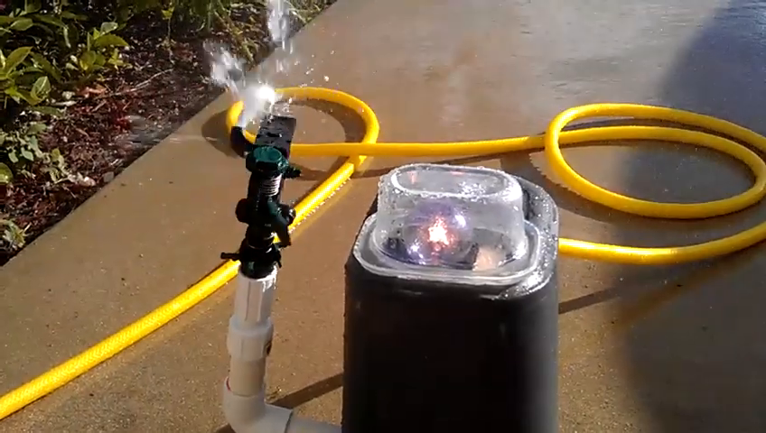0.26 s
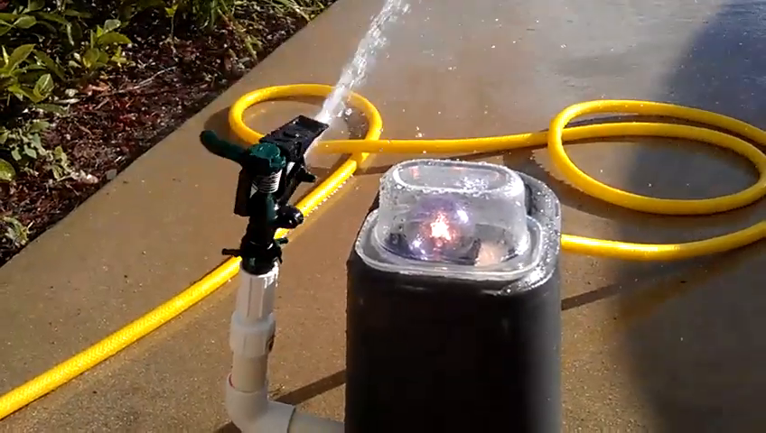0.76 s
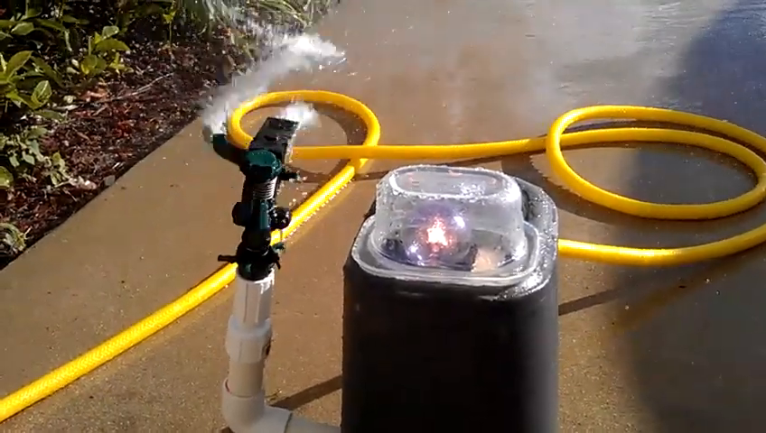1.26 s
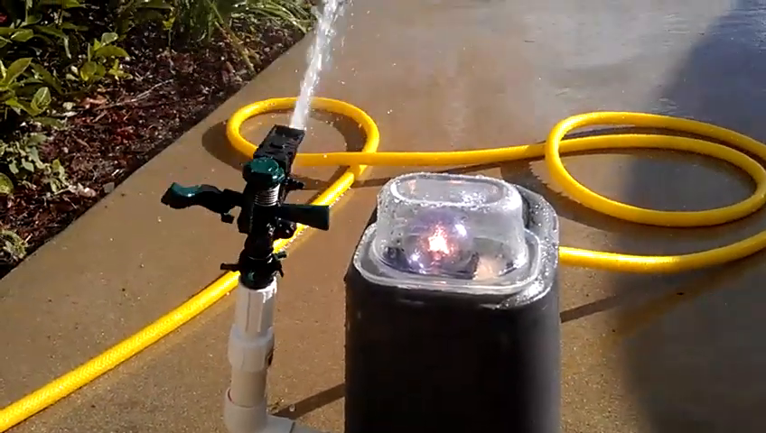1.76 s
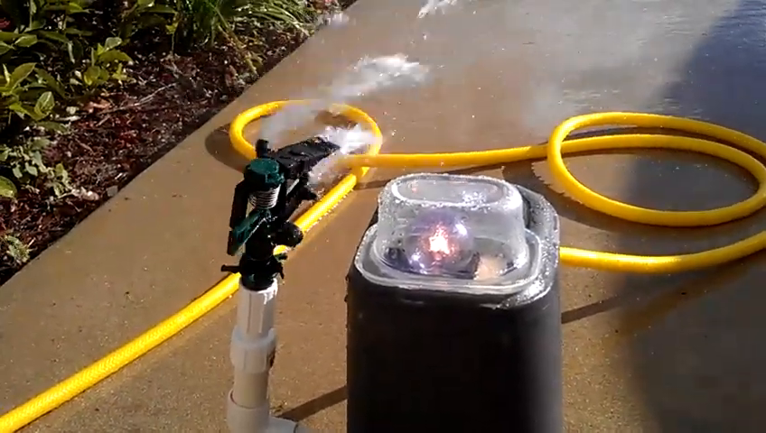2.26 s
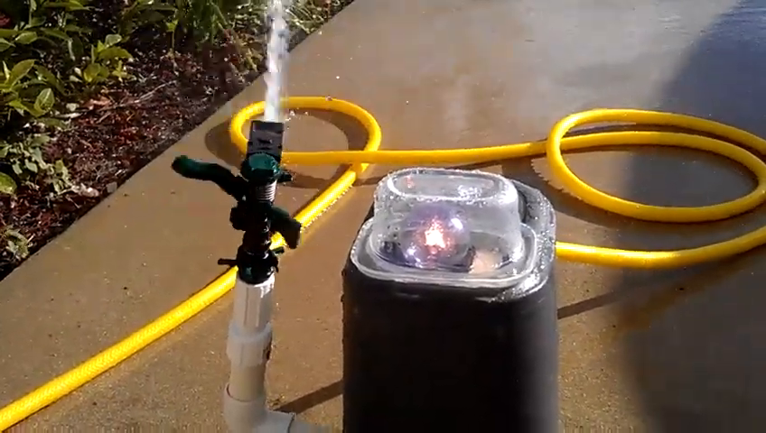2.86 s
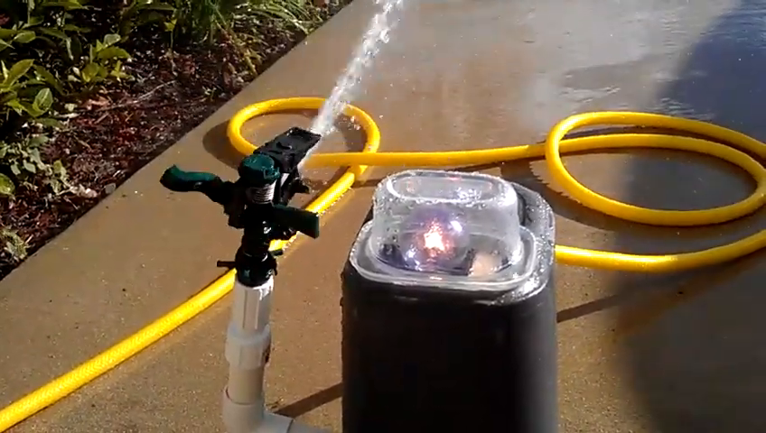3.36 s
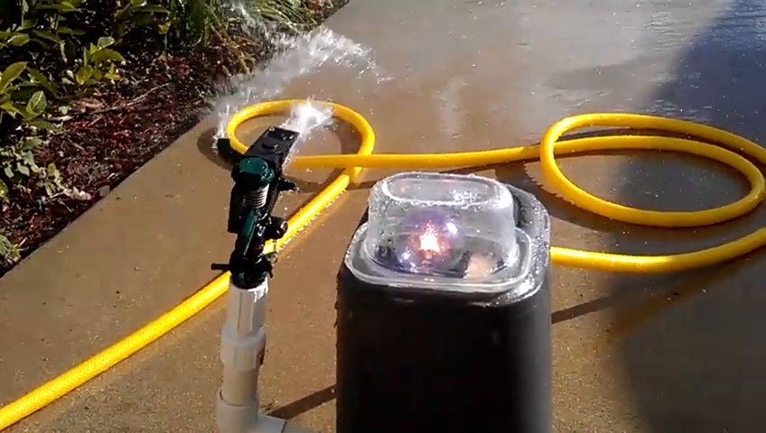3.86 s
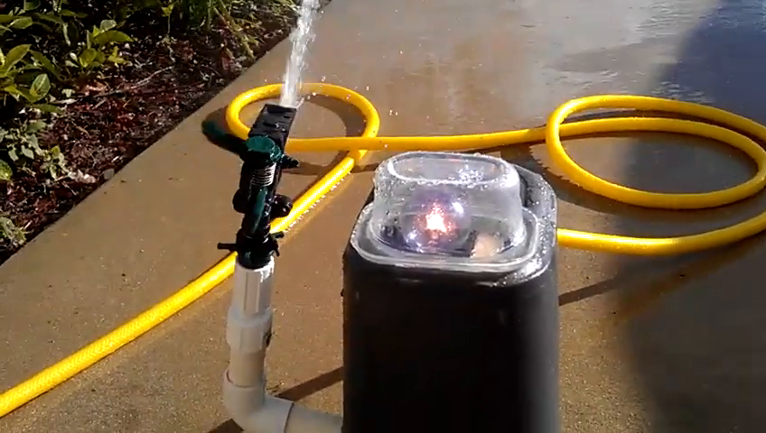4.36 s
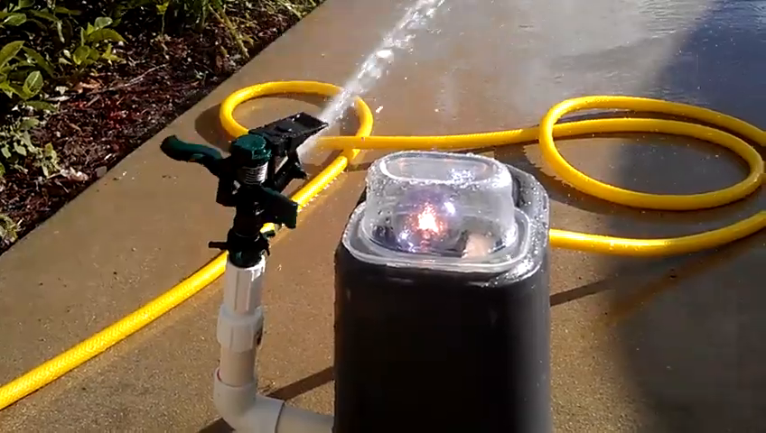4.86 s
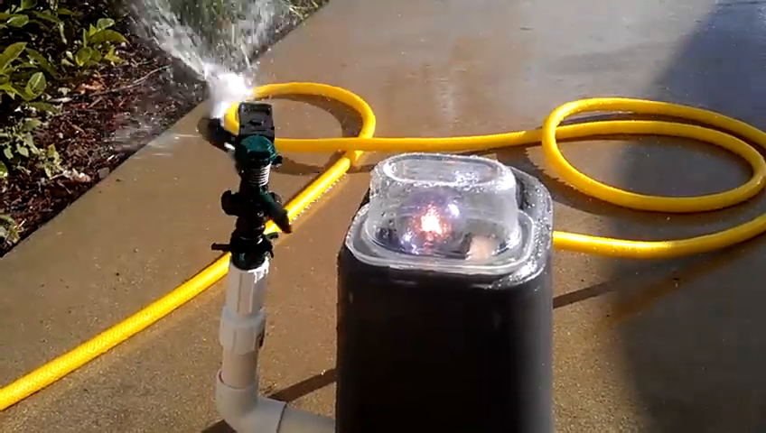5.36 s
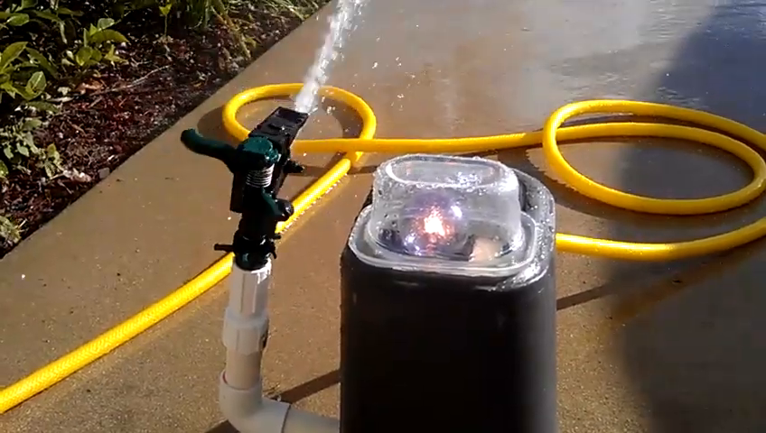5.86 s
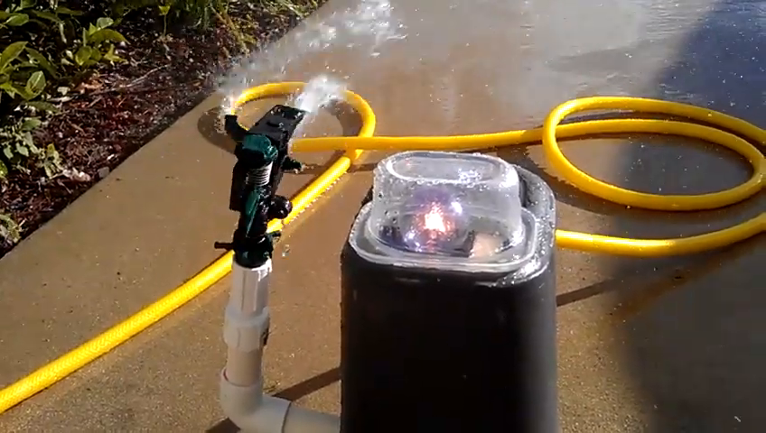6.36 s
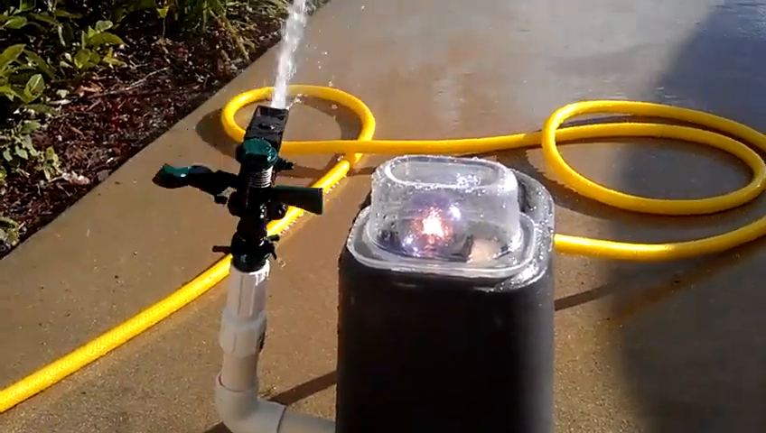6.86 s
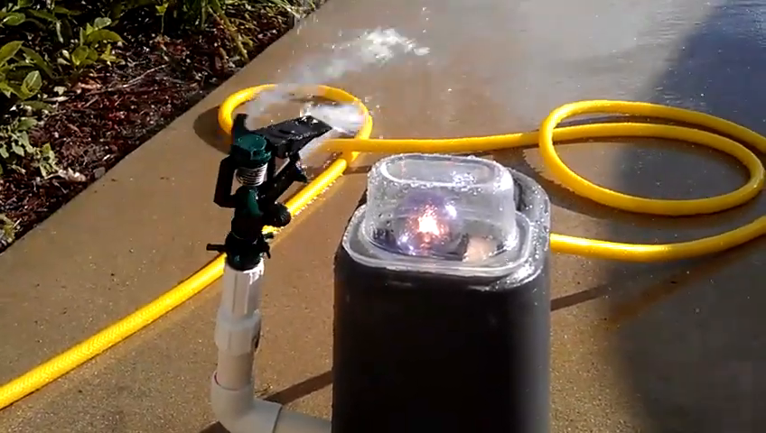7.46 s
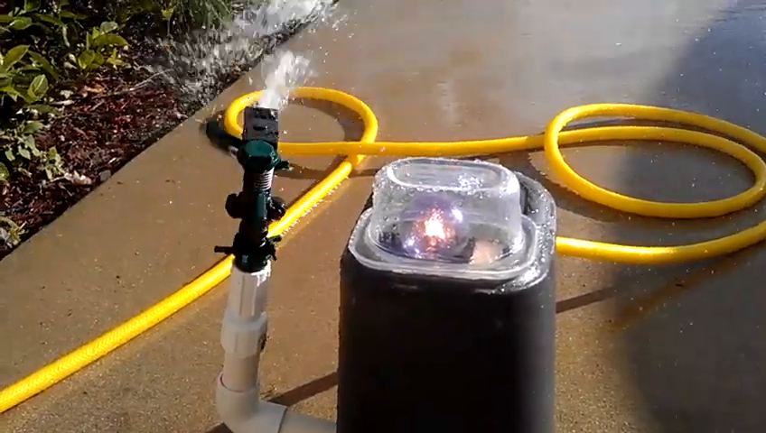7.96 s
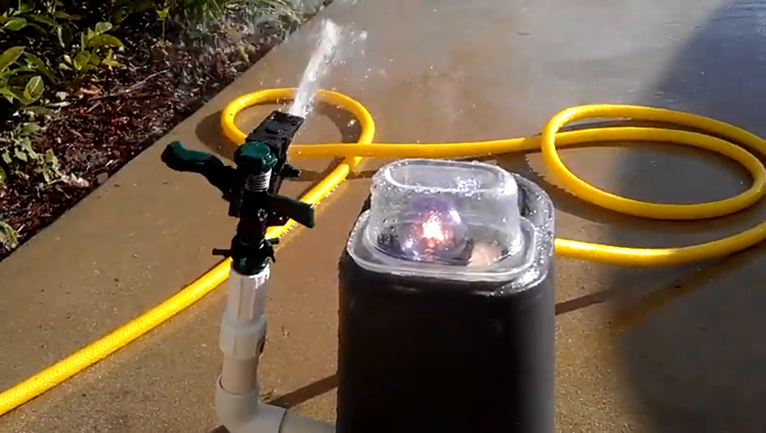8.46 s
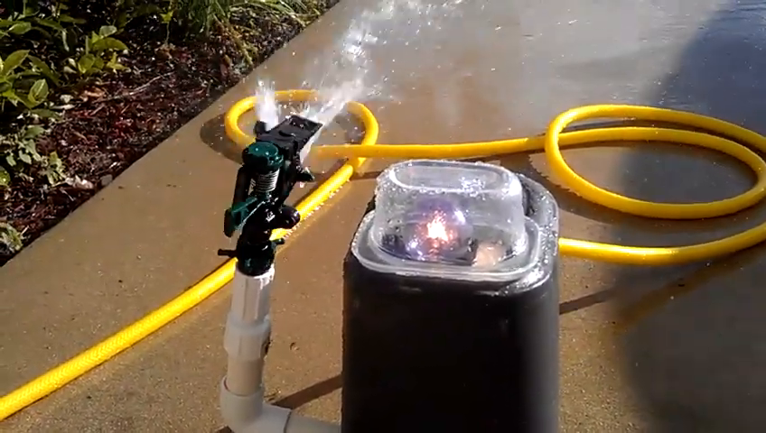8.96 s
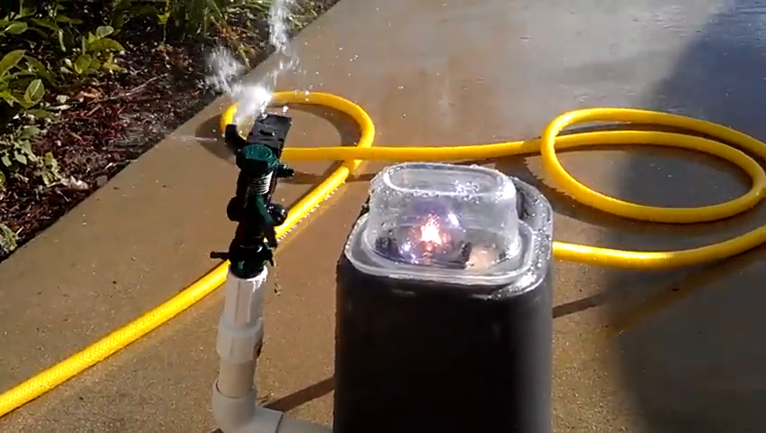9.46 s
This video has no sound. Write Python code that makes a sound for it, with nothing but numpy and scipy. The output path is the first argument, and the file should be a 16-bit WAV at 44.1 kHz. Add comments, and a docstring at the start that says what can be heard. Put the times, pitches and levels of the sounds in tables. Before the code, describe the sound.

Very close stereo pickup of an impact sprinkler beside a concrete path. The arm slaps the jet evenly, about nine crisp splashy knocks a second for nearly a second; a harder slap trips the reverse and it chatters back three times as fast for under half a second. The cycle repeats throughout. Bright water hiss, patter, tiny drop plinks and soft wind thumps fill in; loud peaks distort slightly.

```python
"""An impact sprinkler sweeps to and fro beside a concrete path: going out, its arm slaps the jet about nine
times a second; coming back it chatters about three times as fast. Strokes gate hissing noise into splashes
and strike decaying modes of head and riser pipe. The jet hisses and spray patters as shaped noise, the riser
hums as a sine, and drops plink as damped sines. A breeze buffets the two microphone ports, and loud peaks
overload them."""
import sys
import numpy as np
from scipy import signal
from scipy.fft import rfft, irfft
from scipy.io import wavfile
from scipy.ndimage import uniform_filter1d

SR = 44100
rng = np.random.default_rng(int(sys.argv[2]) if len(sys.argv) > 2 else 0)


def store_pcm(level_fs):
    """Save levels as 16-bit WAV."""
    pcm = np.round(np.clip(level_fs, -1, 1) * 32767).astype(np.int16)
    wavfile.write(sys.argv[1], SR, np.atleast_2d(pcm).T)


N = 428211
TIME = np.arange(N) / SR  # s
FREQ = np.arange(N // 2 + 1) * SR / N  # Hz
SHORT_TIME = TIME[:SR // 4]  # s, for envelopes and rings


def undb(db):
    """Logarithmic level: decibels become an amplitude gain."""
    return 10 ** (np.asarray(db) / 20)


def delay(x, seconds):
    """Propagation delay: the same sound a little later."""
    return np.interp(TIME - seconds, TIME, x, left=0)


def add(track, start, sound):
    """Linear superposition: a short sound is mixed into a track at a time in seconds."""
    i = max(int(start * SR), 0)
    track[..., i:i + sound.shape[-1]] += sound[..., :max(N - i, 0)]


def walk(rate):
    """Random modulation: smooth chance with a spread near 1, taking a new value rate times a second."""
    steps = rng.standard_normal(N // 8)
    return 1.33 * np.interp(TIME * rate, np.arange(len(steps)), steps)


def noise(spectrum, shared, grain_db=0):
    """Partial coherence: shaped noise of rms 1 at two ports, a share of its power common to both."""
    hz, db = np.transpose(spectrum)
    # uneven droplet sizes make the noise grainy
    drops = rng.standard_normal((3, N)) * undb(grain_db * walk(2500))
    share = np.clip(shared, 0, 1)
    pair = np.sqrt(share) * drops[0] + np.sqrt(1 - share) * drops[1:]
    shape = undb(np.interp(np.log(FREQ + 1), np.log(hz), db))
    x = irfft(rfft(pair) * shape, N)
    return x / x.std()


def burst(rise, hold, fall):
    """Exponential decay: a level opens in rise s, stays until hold s and dies with time constant fall s."""
    opening = np.minimum(SHORT_TIME / rise, 1)
    return opening * np.exp(-np.maximum(SHORT_TIME - hold, 0) / fall)


def swell(centre, width):
    """Gaussian envelope: a bell of standard deviation width s, centre s after its start."""
    return np.exp(-((SHORT_TIME - centre) / width) ** 2 / 2)


def lowpass(x, hz):
    """Zero-phase filtering: the part of a sound below hz, not shifted in time."""
    return signal.sosfiltfilt(signal.butter(4, hz, fs=SR, output="sos"), x)


def bumps(resonances):
    """Resonance: each (Hz, width Hz, dB) row lifts or dips the gain around its frequency."""
    return undb(sum(db / (1 + (2 * (FREQ - hz) / width) ** 2) for hz, width, db in resonances))


def beats(first, last, period):
    """Periodic motion: evenly spaced times from first to last, about period s apart."""
    return np.linspace(first, last, round((last - first) / period) + 1)


# Outward sweeps, the arm swinging evenly into the jet.
# Each row: first slap in seconds, last slap in seconds, relative force in dB.
OUTWARD_SWEEPS = [(0.221, 1.068, 0.2), (1.571, 2.316, -0.5), (2.848, 3.703, -0.1), (4.228, 4.971, 1),
                  (5.527, 6.267, 1), (6.763, 7.613, .5), (8.173, 8.922, 0.8), (9.408, 9.731, 0.7)]
# Single slaps that land harder than the rest. Each row: time in seconds, extra force in dB.
HARDER_SLAPS = [(3.062, 2.5), (4.866, 8.5), (5.843, 4), (6.763, 3.5), (7.297, 6), (8.814, 13.5)]
SWING_S = 0.1064  # approximate period of a full swing
DWELL_S, TRIP_DWELL_S = 0.0102, 0.016  # time the spoon spends in the jet
TRIP_DB = 5.5  # extra force of the last slap
SLAP_SLIP_S, SLAP_SCATTER_DB = 0.0009, 1.9  # spread of timing and force


def slap_strokes():
    """Sprung oscillation: full swings of the arm, as rows of (s, force dB, time in the jet s)."""
    rows = []
    for first, last, sweep_db in OUTWARD_SWEEPS:
        for s in beats(first, last, SWING_S):
            extra_db = sum(extra for when, extra in HARDER_SLAPS if abs(when - s) < SWING_S / 2)
            # the last slap of a sweep trips the reverse: harder and longer
            trip_db, dwell = (TRIP_DB, TRIP_DWELL_S) if s == last else (0, DWELL_S)
            late, hard = rng.standard_normal(2)
            force_db = sweep_db + extra_db + trip_db + SLAP_SCATTER_DB * hard
            rows.append((s + SLAP_SLIP_S * late, force_db, dwell))
    return rows


# Return sweeps, the arm chattering against the reversing stop.
# Each row: first stroke in seconds, last stroke in seconds, relative force in dB.
RETURN_SWEEPS = [(0.010, 0.11, -2.5), (1.102, 1.453, 0.5), (2.349, 2.732, -0.5), (3.735, 4.113, -.5),
                 (5.004, 5.413, -.5), (6.305, 6.649, -0.5), (7.649, 8.036, 0.5), (8.956, 9.3, -0.5)]
SHORT_SWING_S = 0.0349  # approximate period of a short swing
CHATTER_DB, KICK_DB = -1.06, 4.5  # force of the short swings; extra on the first
CHATTER_SLIP_S, CHATTER_SCATTER_DB = 0.00117, 1.4  # spread of timing and force


def chatter_strokes():
    """Oscillation against a stop: short swings of the arm, as rows of (s, force dB)."""
    rows = []
    for first, last, sweep_db in RETURN_SWEEPS:
        for s in beats(first, last, SHORT_SWING_S):
            kick_db = KICK_DB if s == first else 0  # kicked by the reverse
            late, hard = rng.standard_normal(2)
            force_db = CHATTER_DB + sweep_db + kick_db + CHATTER_SCATTER_DB * hard
            rows.append((s + CHATTER_SLIP_S * late, force_db))
    return rows


# Spectrum of the water torn up by the arm. Each row: frequency in Hz, relative level in dB per Hz.
SPLASH_SPECTRUM = [(100, -87), (500, -23.5), (1600, -23.5), (2600, -17), (3400, -11.5), (4300, -4),
                   (5100, -4.5), (6400, 2), (8000, 0.5), (9400, -2.5), (10200, -12), (12000, -17),
                   (14000, -33.5)]
MIST_HZ, MIST_LAG_S, MIST_SHARE = 5400, 0.0052, 0.35  # part of the hiss above MIST_HZ trails as fine mist
SKIM_DB = -14  # all through a return sweep the spoon skims the jet


def splashes(slaps, chatter):
    """Jet break-up: the spoon shreds the jet while in it, a coarse tearing first, finer mist just after."""
    slap_level, chatter_power = np.zeros((2, N))
    # the first bite into the jet is the hardest; the shredded water then thins out
    bite = 1 + undb(-0.5) * burst(rise=0.001, hold=0.0048, fall=0.0035)
    for s, db, dwell in slaps:
        cut = bite * burst(rise=0.0038, hold=dwell, fall=0.013)
        add(slap_level, s - 0.001, undb(0.44 * db) * cut)
    short_cut = burst(rise=0.003, hold=0.015, fall=0.008)
    for s, db in chatter:
        add(chatter_power, s - 0.0015, (undb(db) * short_cut) ** 2)

    returning = np.zeros(N)
    for first, last, _ in RETURN_SWEEPS:
        returning += (TIME > first - SHORT_SWING_S / 2) & (TIME < last + SHORT_SWING_S * 0.75)
    skim = undb(SKIM_DB) * uniform_filter1d(returning, size=400)

    # the three kinds of spray add in power
    sheet = np.sqrt((undb(-2) * slap_level) ** 2 + undb(-5.2) ** 2 * chatter_power + skim ** 2)
    mist = (1 - MIST_SHARE) * sheet + MIST_SHARE * delay(sheet, MIST_LAG_S)
    hiss = undb(0.83 * walk(300)) * noise(SPLASH_SPECTRUM, shared=0.34, grain_db=1.0)
    coarse = lowpass(hiss, MIST_HZ)
    return sheet * coarse + mist * (hiss - coarse)


# Ringing modes of head and riser. Each row: frequency in Hz, decay by 60 dB in seconds, relative level in dB.
BODY_MODES = [(208.2, 0.35, -14.5), (281, 0.078, -2.5), (540, 0.052, -35), (636, 0.072, -3),
              (684, 0.076, 0.5), (832, 0.17, -7), (863, 0.031, 6.5), (991, 0.06, 0.5), (1160, 0.045, 5.5),
              (1222, 0.04, 2), (2020, 0.024, 7), (2813, 0.063, -0.5), (4320, 0.026, 16)]
# Spectrum of the crack as the arm meets jet and frame. Each row: frequency in Hz, relative level in dB per Hz.
CRACK_SPECTRUM = [(30, -23), (150, -3.5), (480, -4.5), (700, 2.5), (1200, 2.5), (1600, -2), (3000, -1.5),
                  (6000, -14), (14000, -2)]


def knocks(slaps, chatter):
    """Modal excitation: the arm strikes the frame and bounces; blows crack and ring head and riser."""
    cracks, blows = np.zeros((2, N))
    for (s, db, dwell), (bounce, slip) in zip(slaps, rng.standard_normal((len(slaps), 2))):
        # the strike, then the bounce as the spoon leaves the jet
        for lag, share_db in ((0.0015, 2), (1.05 * dwell, -7 + 2 * bounce)):
            add(cracks, s + lag, undb(db + share_db) * burst(rise=0.0022, hold=0.0044, fall=0.007))
            add(blows, s + lag + 0.004 + 0.0005 * slip, undb([0.58 * db + share_db]))
    for (s, db), luck in zip(chatter, rng.standard_normal((len(chatter), 2, 2))):
        # on the short swing the arm hits the frame, then the reversing stop
        for lag, (late, hard) in zip((0.0095, 0.0235), luck):
            add(blows, s + lag + 0.00185 * late, undb([0.5 * db - 8 + 3.2 * hard]))

    body = np.zeros((2, N))
    for hz, t60, db in BODY_MODES:
        ring = undb(db - 60 * SHORT_TIME / t60) * np.cos(2 * np.pi * hz * SHORT_TIME)
        # no two blows land on the same spot, so each wakes the modes differently, and differently per port
        wake = undb(2.2 * walk(50)) + 0.39 * np.array([walk(50), walk(50)])
        body += signal.oaconvolve(blows * wake, ring[None], axes=1)[:, :N]
    crack_noise = noise(CRACK_SPECTRUM, shared=0.4, grain_db=2.5)
    return undb(-28.0) * body + undb(-11.0) * cracks * crack_noise


# Spectrum of the free jet and its falling spray. Each row: frequency in Hz, relative level in dB per Hz.
SPRAY_SPECTRUM = [(60, -28), (130, -20), (400, -17), (800, -12.5), (1700, -12.5), (3300, -11), (4300, -4),
                  (5200, -4), (6200, 5.5), (8800, 2), (10200, -5.5), (12000, -11.5), (14000, -21.5)]


def spray(slaps):
    """Turbulent jet noise: a steady hiss sizzles as the arm nears, and each thrown sheet lands later."""
    grazing, landing = np.zeros((2, N))
    # a stroke after more than half a second starts from rest and grazes the jet less beforehand
    from_rest = np.diff([row[0] for row in slaps], prepend=-1) > 0.5
    luck = rng.standard_normal((len(slaps), 2))
    for (s, _, _), rested, (graze, land) in zip(slaps, from_rest, luck):
        add(grazing, s - 0.06, undb(1.2 * graze - 3.1 * rested) * swell(centre=0.056, width=0.024))
        add(landing, s, undb(1.0 * land) * swell(centre=0.078, width=0.044))
    jet_level = np.hypot(undb(-20.5), undb(-14) * grazing)
    jet = jet_level * noise(SPRAY_SPECTRUM, shared=0.3, grain_db=-1.0)
    patter = undb(-19.5) * landing * noise(SPRAY_SPECTRUM, shared=0.35, grain_db=-1)
    return (jet + patter) * undb(0.35 * walk(60))


# Hollows of nozzle and spoon. Each row: frequency in Hz, width in Hz, gain in dB.
NOZZLE_HOLLOWS = [(3570, 120, 4.5), (4505, 40, 6), (4720, 170, -2), (5130, 270, 1), (5870, 200, 5),
                  (6030, 123, -12.5), (6150, 130, 4), (7130, 270, 0.5)]


def hollows(x):
    """Cavity resonance: the hollows of nozzle and spoon colour all the hiss."""
    return irfft(rfft(x) * bumps(NOZZLE_HOLLOWS), N)


def gurgle(x, depth_db, rate):
    """Amplitude modulation: changing sheets and beads make each band up to 8 kHz flicker on its own."""
    out, below = 0, 0
    # all below 2 kHz is one band, then come half octaves
    for edge_hz in 2000 * np.sqrt(2) ** np.arange(5):
        low = lowpass(x, edge_hz)
        out = out + (low - below) * undb(depth_db * walk(rate))
        below = low
    return out + (x - below)


# Spectrum of water rushing through the riser. Each row: frequency in Hz, relative level in dB per Hz.
FLOW_SPECTRUM = [(25, -42), (90, -48), (150, 1), (205, 10), (240, 8), (290, 3.5), (350, -5), (600, -24.5),
                 (2000, -50)]
RISER_HZ = 211.4  # lowest resonance


def riser(chatter):
    """Forced resonance: water rushes in the pipe, and the chattering arm shakes it into a hum."""
    shaking = np.zeros(N)
    for s, _ in chatter:
        add(shaking, s - 0.02, swell(centre=0.014, width=0.021))
    cycles = np.cumsum(RISER_HZ + 1.6 * walk(9)) / SR
    hum = np.sin(2 * np.pi * cycles) * undb(1.3 * walk(20))
    rush = (undb(-45.0) + undb(-53) * shaking) * noise(FLOW_SPECTRUM, shared=1.0)
    return rush + (undb(-45.0) + undb(-37.5) * shaking) * hum


# Stray drops that plink close by. Each row: start in seconds, pitch in Hz, level in dB.
CLOSE_DROPS = [(2.262, 2660, -16), (3.627, 2620, -16), (6.742, 2190, -24), (8.871, 2750, -7.5),
               (8.904, 2680, -12)]


def plinks():
    """Bubble resonance: landing drops trap a ringing bubble, a few close by and many small on the path."""
    out = np.zeros(N)
    for s, hz, db in CLOSE_DROPS:
        envelope = burst(rise=0.00081, hold=0.0017, fall=0.0069)
        add(out, s, undb(db) * envelope * np.sin(2 * np.pi * hz * SHORT_TIME))
    t = TIME[:SR // 40]
    for when, pitch, size in rng.random(size=(500, 3)):
        cycles = 1900 * 2 ** (1.6 * pitch) * t
        db = -39 + 15 * size ** 3
        add(out, when * N / SR, undb(db) * np.exp(-cycles / 11) * np.sin(2 * np.pi * cycles))
    return out


# Spells of breeze. Each row: middle in seconds, half-length in seconds, relative level in dB.
BREEZE_SPELLS = [(.62, 0.24, -20), (2.05, 0.27, -17.5), (3.447, 0.21, -28.5), (5.63, .1, -24),
                 (6.073, 0.21, -22.5)]
# The strongest eddies. Each row: time in seconds, relative left level in dB, relative right level in dB.
EDDY_THUMPS = [(0.335, -17, -22), (0.399, -16, -1.5), (0.629, -12, -25), (1.632, -32, -10.5),
               (1.849, -18, -6.5), (1.866, -22, -3.5), (2.096, -18, -5), (2.141, -21, -9.5),
               (4.288, -23, -8.5), (4.309, -15, -7), (5.985, -19, -1.5), (6.024, -21, -7), (8.828, -9, -20)]
# Spectrum of wind in the ports. Each row: frequency in Hz, relative level in dB per Hz.
WIND_SPECTRUM = [(30, -45), (90, -30), (150, -2.5), (220, 3), (400, -5.5), (600, -10.5), (1000, -30.5),
                 (3000, -60)]


def wind():
    """Turbulent pressure: spells of breeze flutter on the ports; now and then a strong eddy thumps."""
    breeze = sum(undb(db) * np.exp(-((TIME - s) / half) ** 2 / 2) for s, half, db in BREEZE_SPELLS)
    lee_db = -9  # the left port lies in the lee
    flutter = breeze * undb([[lee_db], [0]]) * undb(4.0 * walk(45))
    eddies = np.zeros((2, N))
    for s, left_db, right_db in EDDY_THUMPS:
        add(eddies, s - 0.04, undb([[left_db], [right_db]]) * swell(centre=0.037, width=0.0071))
    level = undb(-7.0) * np.hypot(flutter, eddies) * undb(3.9 * walk(160))
    return level * noise(WIND_SPECTRUM, shared=0.59)


# By how much the left port leads the right. Each row: frequency in Hz, phase lead in radians.
PORT_LEAD = [(0, 0), (860, 0.13), (2760, -0.1), (3450, 2.5), (4480, 1.5), (5080, 2.5), (5770, 2.5),
             (6630, 1.58), (7580, 1.8), (9730, 6), (10400, 6.0), (10900, 3.5), (11200, 6), (13500, 7.5)]


def lag_right(right):
    """Interaural phase difference: the right port hears each frequency later in phase than the table's left."""
    lag = np.exp(-1j * np.interp(FREQ, *np.transpose(PORT_LEAD)))
    return irfft(rfft(right) * lag, N)


def scene():
    """Superposition and reflection: the sprinkler stands a little to the left; the path echoes it briefly."""
    slaps, chatter = slap_strokes(), chatter_strokes()
    water = hollows(splashes(slaps, chatter) + spray(slaps))
    left, right = gurgle(water, depth_db=1.87, rate=90) + knocks(slaps, chatter) + riser(chatter)
    near = np.array([left, lag_right(right)])
    path_echo = np.array([delay(x, 0.0049) for x in near])
    return near + undb(-32.0) * path_echo + wind() + plinks()


# Colour of each microphone port. Each row: frequency in Hz, width in Hz, gain in dB.
LEFT_COLOUR = [(1250, 1900, 1.5), (6340, 2300, 0.5), (8000, 2800, -2.5)]
RIGHT_COLOUR = [(1610, 3900, -0.5), (6450, 3700, -4.5), (8510, 570, 5)]
CEILING = 0.92  # full scale is 1
LOW_CUT_HZ, TOP_HZ = 55, 14000


def record(dry):
    """Overload and band limiting: ports colour the sound, loud peaks clip, deep bass and top are cut."""
    heard = irfft(rfft(dry) * np.array([bumps(LEFT_COLOUR), bumps(RIGHT_COLOUR)]), N)
    clipped = np.clip(heard, -CEILING, CEILING)
    low_cut = signal.butter(2, LOW_CUT_HZ, "highpass", fs=SR, output="sos")
    top_cut = signal.ellip(8, 0.2, 70, TOP_HZ, fs=SR, output="sos")
    return signal.sosfilt(top_cut, signal.sosfilt(low_cut, clipped))


dry = scene()
out = record(dry)
store_pcm(out)
```